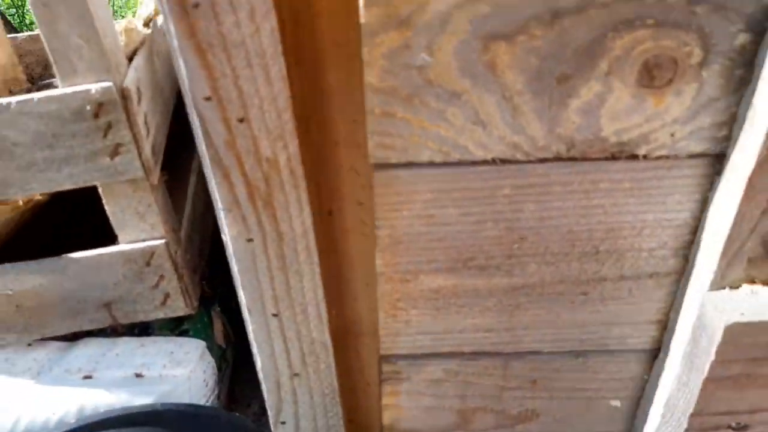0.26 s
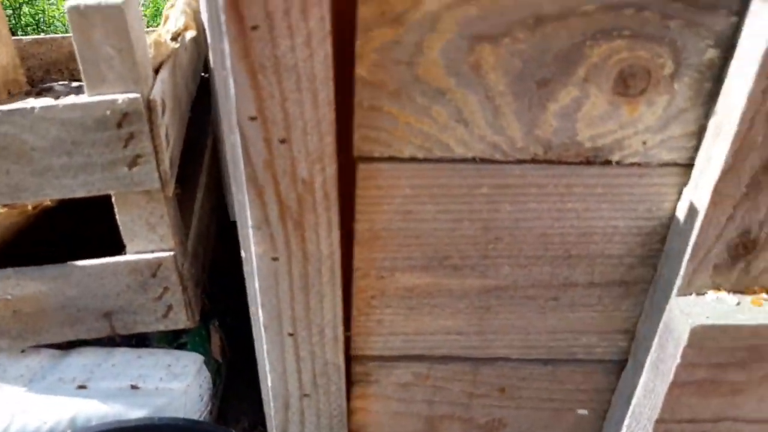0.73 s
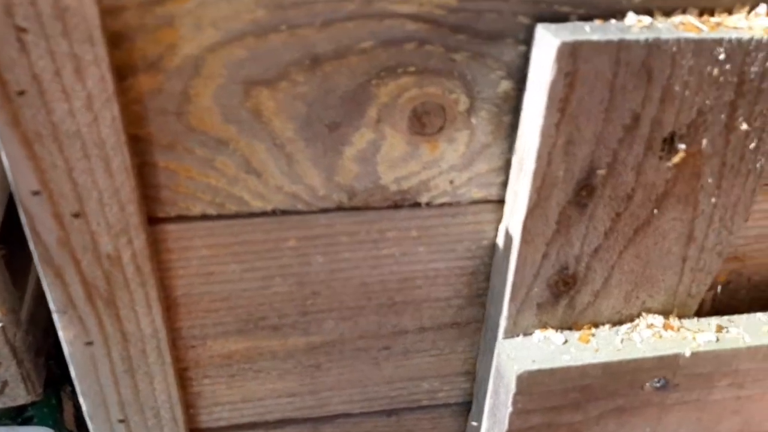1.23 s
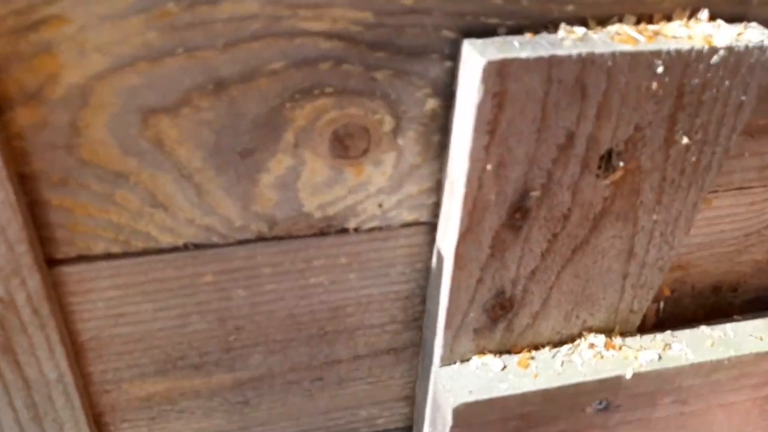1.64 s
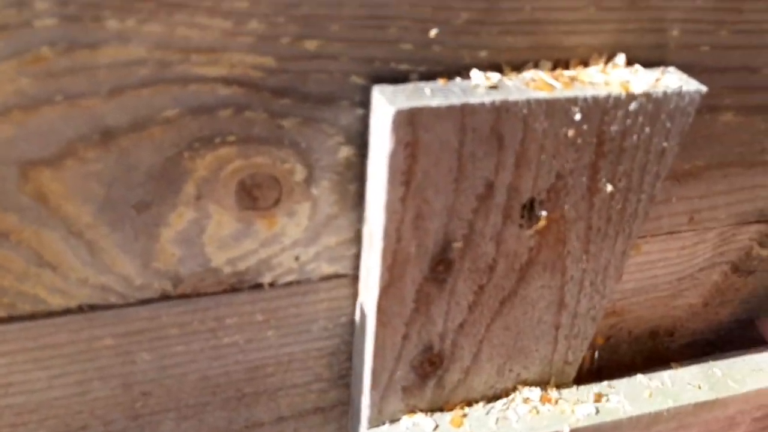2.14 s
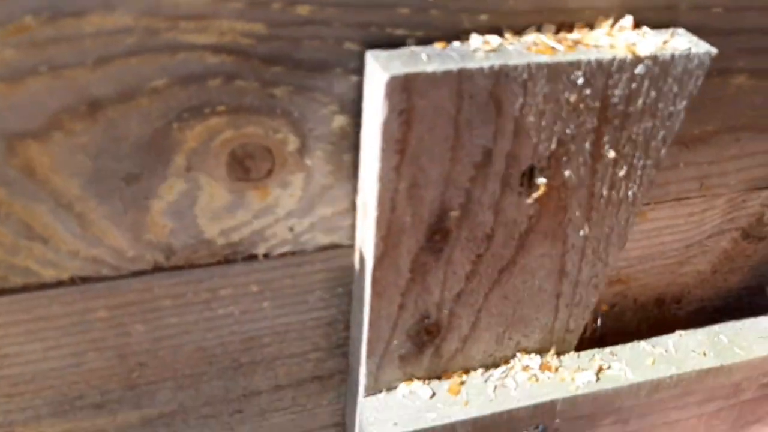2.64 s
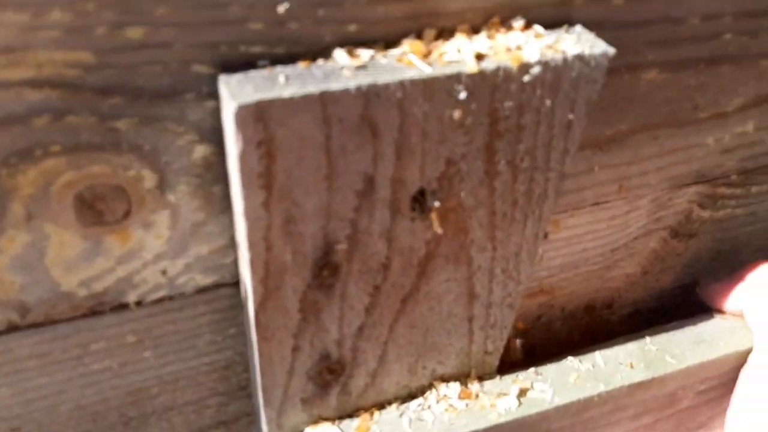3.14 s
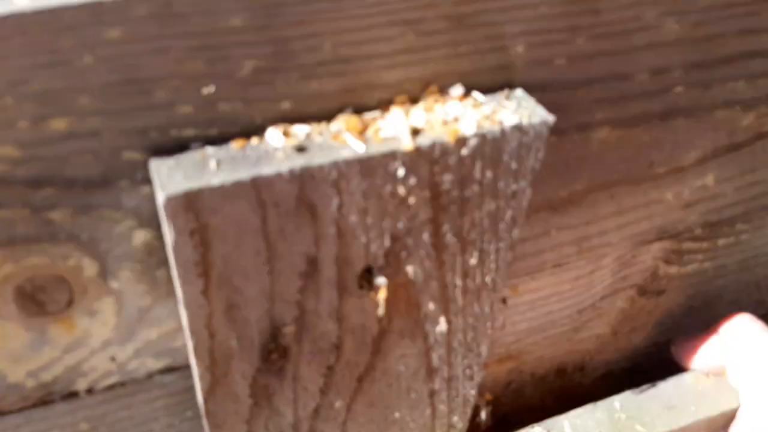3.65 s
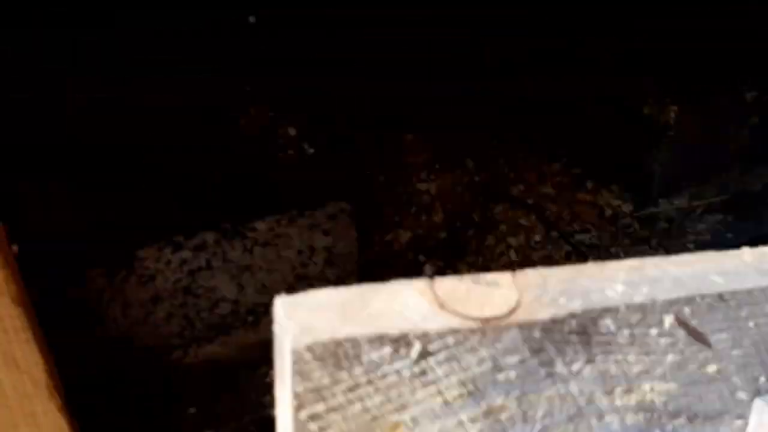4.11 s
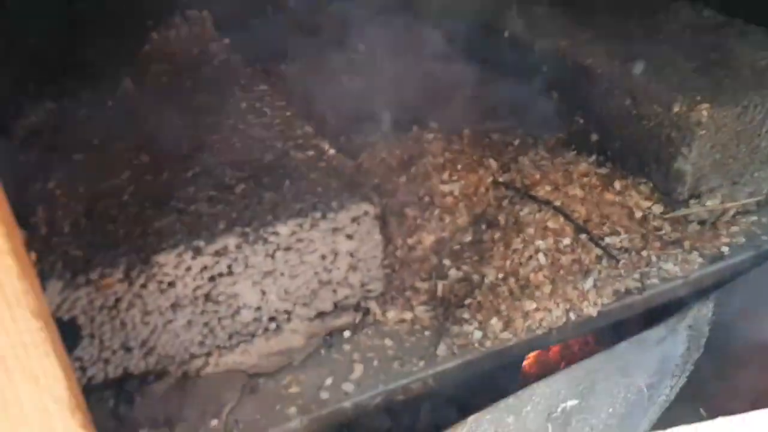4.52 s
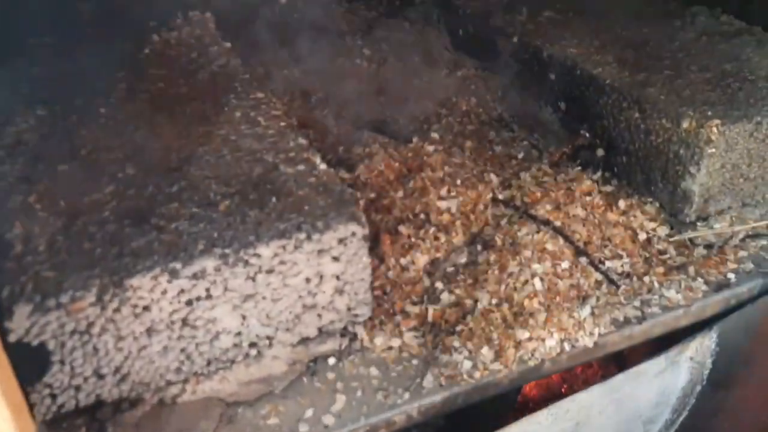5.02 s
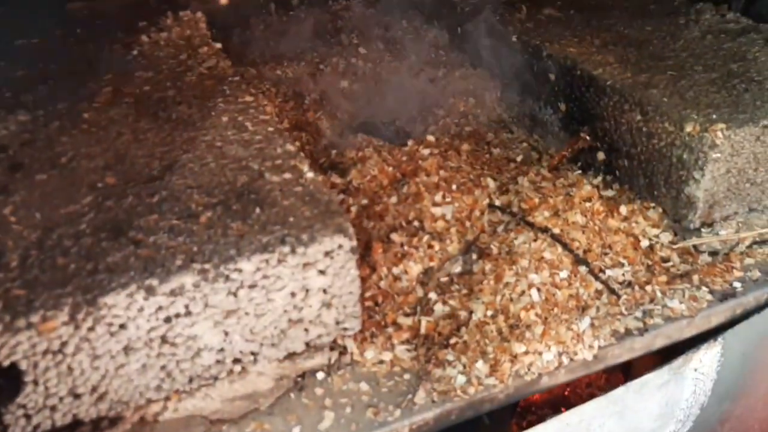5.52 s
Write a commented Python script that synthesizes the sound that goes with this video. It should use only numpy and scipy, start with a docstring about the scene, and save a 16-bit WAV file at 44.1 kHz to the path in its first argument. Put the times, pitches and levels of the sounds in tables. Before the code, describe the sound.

Hands shift dry wooden boards: faint rubbing, dull and sharp knocks in small groups, then a rapid clatter and one loud crack. A pause follows, then a clack as another board slides, squeaking briefly, hissing over wood chips, catching and juddering to the end. Heard close and slightly right, in a quiet yard with a faint hollow answer from the wooden box.

```python
"""Wooden planks, shifted by hand before a wooden smoker, knock, rub and once snap hard: damped modes
ringing under a dense noise cloud, and filtered slips for the rubbing.
Then a board strewn with chips is dragged aside: it squeaks (fuzzy whistle over shaken resonances),
hisses (noise through resonances) and judders (irregular slips, each ringing the board).
The box and yard answer faintly with decaying noise; the outdoor air is quiet filtered noise."""
import sys
import numpy as np
from scipy import signal
from scipy.fft import rfft, irfft, next_fast_len
from scipy.io import wavfile
from scipy.ndimage import uniform_filter1d, map_coordinates

SR = 44100
rng = np.random.default_rng(int(sys.argv[2]) if len(sys.argv) > 2 else 0)


def put_to_file(sound):
    """Save the sound as 16-bit audio at rate SR, in the file named by the first command-line argument."""
    columns = np.atleast_2d(sound).T  # one column per channel
    safe = np.clip(columns, -1, 1)
    whole_steps = np.round(safe * 32767)
    wavfile.write(sys.argv[1], SR, whole_steps.astype(np.int16))


N = 254456

# air noise spectrum: (frequency [Hz], density [dB/Hz])
AIR_SPECTRUM = [(15, -79), (25, -38.5), (45, -11.5), (92, -12), (141, -20.5), (206, -19.5), (405, -37.5),
                (489, -53), (2000, -58.5), (3520, -51), (9570, -57), (14800, -55), (16000, -72)]
# left-right likeness of diffuse sound: (frequency [Hz], correlation [0-1])
LIKENESS = [(100, 0.99), (300, 0.98), (700, 0.8), (3000, 0.28), (12000, 0.067)]
# bearing: (time [s], lag of the left port behind the right [ms], left over right [dB])
BEARING = [(0.3, 0.29, -6.5), (0.5, 0.32, -3), (3.3, 0.2, -2.5), (3.7, -0.31, -2), (3.98, -0.43, -2.2),
           (4.05, 0.35, -5.5), (5.3, 0.24, -2), (5.77, 0.33, -2.5)]

# soft hush of the first sliding plank: (time [s], level [dB])
HUSH_LEVEL = [(0, -49.5), (0.5, -57), (1.4, -56.5), (2.3, -57.5), (2.7, -64), (3.1, -89)]
# its spectrum: (frequency [Hz], density [dB/Hz])
HUSH_SPECTRUM = [(250, 3), (480, -4.5), (590, 3.5), (1000, -10.5), (1750, -2), (1950, -12.5), (2200, -4),
                 (2900, -14.5), (4000, -11), (4700, -8.5), (5600, -14), (9000, -22.5), (16000, -24)]

# short strokes of wood over wood:
# (start [s], length [s], level [dB], groan over level [dB], grit over level [dB])
STROKES = [(0.151, 0.1, -47, 7, -12), (0.239, 0.12, -58.5, 17, -16), (0.424, 0.15, -49, -7, -10.5),
           (0.578, 0.18, -49, -4, -8.5), (0.635, 0.78, -56, 9.5, -12), (0.877, 0.081, -44, -10, -11),
           (0.938, 0.043, -38.5, -7, -12), (0.984, 0.085, -43.5, 15.5, -16),
           (0.988, 0.44, -61.5, 15.5, -15), (1.269, 0.095, -49, -14, -37), (1.362, 0.054, -42, 9, -23),
           (1.535, 0.052, -46, 9.5, -34), (1.809, 0.15, -47.5, 5.5, -18), (1.96, 0.15, -56.5, 10.5, -22),
           (2.28, 0.072, -47, 4, -13), (2.39, 0.091, -47, 2, -9.5), (2.504, 0.075, -45, 5.5, -15),
           (2.656, 0.064, -42.5, -9.5, -20), (2.713, 0.092, -39.5, -5, -8), (2.851, 0.051, -37, 4, -3),
           (2.898, 0.03, -34, -5.5, 2.5), (2.986, 0.26, -60.5, 12.5, -11), (3.291, 0.21, -65, -0.5, -1.5),
           (3.417, 0.13, -55.5, 10, -22.5), (3.71, 0.21, -41, 3, -15), (4.155, 0.076, -36, -23, -7),
           (4.794, 0.051, -34, -9.5, -12)]
STROKE_ATTACK, STROKE_RELEASE = 0.3, 0.71  # shares of the length
# spectra of a rubbed plank's body and face, and of grit: (frequency [Hz], density [dB/Hz])
RUB_GROAN = [(35, -43), (60, -10.5), (150, -2.5), (300, -4), (400, -8), (480, -17), (650, -17), (900, -25),
             (1500, -61.5)]
RUB_RASP = [(450, -38.5), (700, -16), (1000, 0), (1650, -3.5), (1980, -5), (2200, -11.5), (2800, -9.5),
            (4700, -13), (5600, -19), (7500, -20), (11000, -46)]
GRIT = [(4000, -5.5), (6000, 0), (8400, -2), (9300, -5.5), (10400, -1.5), (12000, -1), (13500, -3),
        (16000, -6.5)]

# plank on plank: (time [s], level [dB], thump over body [dB], hardness: clack over body [dB])
KNOCKS = [(0.444, -34.5, 4.5, -8), (0.467, -28, -6, -40), (0.492, -16.5, -5.5, -19), (0.601, -34, 4.5, -20),
          (0.646, -24.5, -1, -12.5), (0.703, -21.5, -7.5, -11), (0.729, -28.5, -8, -9),
          (0.968, -24, -1.5, -0.5), (1.006, -20.5, 0, -2), (1.02, -21.5, -2, -20),
          (1.084, -28.5, -1.5, -21), (1.368, -29, 0.5, 4), (1.378, -22.5, -14.5, -3.5),
          (1.526, -42.5, 8, -7), (1.642, -27.5, -6, -2.5), (1.797, -15, -10, -7), (1.835, -35, -22, 4.5),
          (2.187, -34, -2.5, -5), (2.545, -21.5, -3, -5), (2.57, -21, -14, -7), (2.784, -13.5, -2.5, 1.5),
          (2.8, -15, -8.5, -15.5), (2.829, -26.5, -13, 2), (2.855, -26.5, -8, -20),
          (2.899, -14.5, 1.5, -7.5), (2.913, -22, -0.5, 1), (2.937, -17.5, -5.5, -18),
          (3.807, -14.5, -6.5, -0.5), (3.813, -18, -6, -6)]
# plank modes: (frequency [Hz], level [dB], t60 [s])
PLANK_MODES = [(65, -9, 0.57), (91.5, 10, 0.12), (118, 7, 0.2), (151.4, 7.5, 0.24), (164, 6, 0.051),
               (208.5, -4, 0.57), (255.1, -5, 0.27), (288.9, 8.5, 0.17), (316.4, 8.5, 0.073),
               (374.6, 3, .15), (441, -0.5, 0.06), (490.4, -8.5, 0.25), (640, -2.5, 0.067), (775, 2, 0.052),
               (912, -0.5, 0.092), (1059.4, 0, 0.12), (1224, -2, 0.092), (1420, -7, 0.068), (1560, -3, 0.1),
               (2083, -10, 0.04), (2590, 11, 0.028), (3380, 9, 0.034)]
# shared colour of struck wood: (frequency [Hz], level [dB])
WOOD_COLOUR = [(30, -23), (70, -0.5), (300, 1.0), (650, -6.5),
               (1200, 2.5), (3000, -6.5), (6000, -15.5), (15000, -34.5)]
# dense ring of the wood: (frequency [Hz], t60 [s])
GRAIN_T60 = [(100, 0.7), (400, 0.33), (1200, 0.052), (3000, 0.022), (10000, 0.018)]
RISE_S, RISE_DOUBLES_DB = 0.00046, 23.5  # onset at hardness 0; doubles for a contact this much softer
TREBLE_DB, TREBLE_DB_PER_HARD_DB = -21, 0.76

# box and yard decay: (frequency [Hz], t60 [s])
BOX_T60 = [(80, 1), (300, 0.66), (800, 0.62), (3000, 0.12), (7000, 0.84), (10000, 0.36)]
# box and yard answer: (frequency [Hz], gain [dB])
BOX_GAIN = [(100, -13), (300, -14.0), (900, -20.0), (3000, -8.5), (7000, -24.0), (10000, -28.5)]

# snaps of edges and chips: (time [s], level [dB], brightness [dB])
SNAPS = [(0.62, -38.5, -8), (0.9685, -20.5, -11), (0.9725, -21, -25), (0.9935, -18.5, -16.5),
         (1.3675, -24.5, -44), (2.5129, -28.5, -15), (2.5453, -24, -24.5), (2.7884, -18.5, -25),
         (2.829, -20.5, -21.5), (2.911, -5.5, -13), (2.9155, -10.5, -27.5), (3.313, -32.5, -14.5),
         (3.7219, -32, -18), (3.785, -28.5, -12), (3.807, -16.5, -28), (3.8253, -18, -23),
         (3.849, -24, -13), (4.183, -21.5, -12), (4.2288, -17.5, -22), (4.5479, -18.5, -21),
         (4.812, -23, -34), (4.821, -19, -29), (4.858, -28, -12), (5.13, -35.5, -4), (5.1765, -29, -10)]
# modes of a snapping edge: (frequency [Hz], level [dB], t60 [s])
EDGE_MODES = [(1160, -9.5, 0.088), (1690, -3.5, 0.033), (2321, -5.5, 0.038), (2710, -6.5, 0.019),
              (2520, -12.5, 0.026), (3530, -7, 0.058), (3946, -6.5, 0.063), (4600, -6, 0.01),
              (5200, 0.5, 0.0077), (7720, 4, 0.0081), (7500, 2.5, 0.0049), (9120, -11, 0.019),
              (10200, 1, 0.014)]
# diffuse tail of a snap, spectrum: (frequency [Hz], density [dB/Hz])
SNAP_TAIL_SPECTRUM = [(500, -16), (1200, -0.5), (2700, 1.5), (3600, -5.5), (5500, -7.5), (8000, -10.5),
                      (15000, -23)]
# and its decay: (frequency [Hz], t60 [s])
SNAP_TAIL_T60 = [(1000, 0.36), (3000, 0.3), (7000, 0.23), (12000, .24)]

# thin slat caught on its edge: (time [s], pitch [Hz], level [dB])
CLACKS = [(0.969, 1210, -19), (0.993, 1320, -34), (1.007, 1284, -27.5), (2.786, 943, -17),
          (2.83, 1240, -23), (2.914, 950, -15.5)]
# slat modes: (multiple of the pitch [ratio], level [dB])
SLAT_MODES = [(.8, -12), (0.999, 2.5), (1.14, -11)]

# board dragged along the frame: (time [s], scrape level [dB], speed [0-1])
DRAG = [(3.68, -72.5, 0.44), (3.74, -58.5, 0.06), (3.87, -47, 0.73), (4.12, -50.5, 0.87),
        (4.2, -41.5, 0.65), (4.36, -45, 0.89), (4.5, -49.5, 0.96), (4.62, -43, 0.71), (4.76, -57, 1),
        (4.86, -54, 1), (5.04, -44.5, 0.75), (5.16, -44.5, 0.67), (5.26, -43.5, 0.27), (5.38, -51.5, 0.45),
        (5.52, -43.5, 0.03), (5.66, -49.5, 0.3), (5.72, -42.5, 0.03)]
# spectra of its body, its face, and its face while juddering: (frequency [Hz], density [dB/Hz])
DRAG_GROAN = [(60, -44), (100, -1.5), (175, -10.5), (250, 1), (430, -8), (600, -5), (760, -37), (950, -48),
              (1500, -52)]
DRAG_RASP = [(450, 4), (800, 13.5), (1000, 4), (1200, -3), (1380, -22), (1620, -1), (2060, -10),
             (2340, -10), (2680, -2), (3000, 10), (3600, 14.5), (4450, 1), (5400, 7), (6000, -30),
             (7500, 3), (10000, -37)]
JUDDER_RASP = [(250, -12), (430, 1), (780, -23), (980, 3.5), (1200, -6), (1600, -3), (2000, -11),
               (2580, -7.5), (3200, -15.5), (3800, -9), (4400, -12), (7500, -23), (11000, -26.5)]
# resonances of the sliding hiss: (frequency [Hz], width [Hz], level [dB])
FRAME_RESONANCES = [(1173, 56, 2.5), (1760, 290, 1.5), (2360, 150, 6), (3040, 60, 3.5), (3850, 86, 0),
                    (4490, 580, 2.5), (5840, 120, 3), (9140, 610, -5.5)]
FULL_SPEED_GROAN_DB, GROAN_DB_PER_SPEED = -9.5, -10.5  # over the scrape; a slow board groans
FULL_SPEED_GRIT_DB, GRIT_DB_PER_SPEED = 4.5, 30  # a fast one makes the chips hiss
JUDDER_RASP_FROM_S = 5.01

# dry edge squeal: (time [s], whistle pitch [Hz], whistle level [dB], board answer level [dB])
SQUEAK = [(3.83, 5450, -66, -52), (3.86, 5450, -50, -41), (3.9, 5400, -46.5, -42.5),
          (3.98, 5260, -44.5, -35), (4.01, 5000, -46, -33), (4.06, 4998, -44.5, -42.5),
          (4.13, 4840, -50.5, -78), (4.17, 4830, -65, -59)]
# board resonances excited by the squeal: (frequency [Hz], width [Hz], level [dB])
BOARD_RESONANCES = [(148, 32, -10), (240, 67, 4.5), (770, 83, -5.5), (1000, 130, -5), (1440, 120, -5),
                    (2370, 89, -5), (3080, 110, -8)]

# creaks of the sliding edge: (start [s], length [s], start pitch [Hz], end pitch [Hz], level [dB])
CREAKS = [(3.889, 0.033, 1570, 1760, -27.5), (3.933, 0.026, 1427, 1470, -27),
          (3.935, 0.13, 2970, 3030, -44), (4.049, 0.26, 2434, 2380, -46), (4.097, 0.088, 2940, 3020, -45.5),
          (4.222, 0.31, 2360, 2290, -49)]

# dragged board catching on the frame: (time [s], level [dB], hardness [dB], treble [dB])
CATCHES = [(4.168, -34, 6.5, 14.5), (4.227, -45, 20.5, 17), (4.541, -28.5, 9, 12), (4.549, -28, 10.5, 11.5),
           (4.559, -21.5, -15, -26), (4.8, -29.5, -23, 11), (5.011, -28, -6, -25), (5.096, -31.5, -21, -27),
           (5.154, -27, -19, -27), (5.411, -29.5, -3, -1), (5.492, -30.5, 0, 7.5), (5.59, -23, -6.5, -30)]
# dragged board modes: (frequency [Hz], level [dB], t60 [s])
SLIDER_MODES = [(216, -8, 0.78), (253.7, 7, 0.22), (340, 5.5, 0.12), (424.4, 2, 0.22), (493, 6, 0.12),
                (551, 4.5, 0.14), (677, 0, 0.13), (790, -5, 0.07), (982, -1, 0.071), (1284, 8, 0.031),
                (1608, 8.5, 0.081), (2120, 0.5, 0.076)]
CATCH_THUMP_DB, CATCH_RISE_S = -21, 0.0016  # light glancing blows: little thump

# stuttering board: (time [s], relative slip level [dB])
JUDDER_LEVEL = [(4.84, -39), (5.0, -50.5), (5.04, -40), (5.075, -50), (5.11, -31.5), (5.18, -34.5),
                (5.25, -50), (5.31, -33), (5.37, -70), (5.44, -48), (5.56, -41), (5.62, -35), (5.67, -47),
                (5.7, -34)]
# colour of a slip: (frequency [Hz], level [dB])
JUDDER_COLOUR = [(200, -13.5), (420, -1.5), (650, -8.5), (1000, 8.5), (1600, -13), (2100, -9)]

TOP_HZ, TOP_EDGE_HZ = 15900, 200  # band limit and half-width of its slope
TIME = np.arange(N) / SR
RING = np.arange(SR // 2) / SR


def amp(db):
    """Decibels to gain."""
    return 10 ** (np.asarray(db) / 20)


def unit(x):
    """Scale to rms 1."""
    return x / np.sqrt(np.mean(x ** 2) + 1e-20)


def along(points, hz):
    """(Hz, value) points read on a log axis."""
    f, v = np.transpose(points)
    return np.interp(np.log(hz + 1), np.log(f + 1), v)


def curves(rows, t=TIME):
    """Each column after the first, read at times t."""
    s, *cols = np.transpose(rows)
    return [np.interp(t, s, c) for c in cols]


def wobble(rate_hz):
    """A smooth random curve, rate_hz knots a second."""
    knots = rng.standard_normal(int(N * rate_hz / SR) + 4)
    return map_coordinates(knots, [TIME * rate_hz])


def noise_pair(n=N):
    """Two unrelated white noises."""
    return rng.standard_normal((2, n))


def filtered(x, response):
    """x times a response of frequency."""
    n = x.shape[-1]
    m = next_fast_len(n + 8192)
    return irfft(rfft(x, m) * response(np.fft.rfftfreq(m, 1 / SR)), m)[..., :n]


def spread(pair):
    """Two unrelated signals become left and right, alike in the bass."""
    def mid_side(hz):
        turn = np.arccos(np.clip(along(LIKENESS, hz), 0, 1)) / 2
        return np.array([np.cos(turn), np.sin(turn)])
    mid, side = filtered(pair, mid_side)
    return np.array([mid + side, mid - side])


def coloured(pair, spectrum):
    """Spread noise shaped by a (Hz, dB) spectrum."""
    return filtered(spread(pair), lambda hz: amp(along(spectrum, hz)))


def dying(noise, t60s):
    """Each frequency of the noise fades at its own speed."""
    hz, t, z = signal.stft(noise, SR, nperseg=256)
    fade = amp(-60 * t / along(t60s, hz)[:, None])
    return signal.istft(z * fade, SR, nperseg=256)[1][:, :len(RING)]


def resonances(modes, hz):
    """Response of a few (Hz, width, dB) resonances, alternating in sign."""
    return sum((-1) ** k * amp(db) * 1j * hz * width / (centre ** 2 - hz ** 2 + 1j * hz * width)
               for k, (centre, width, db) in enumerate(modes))


def ring(modes, colour, t, scatter_db, port_turn, detune=0.018):
    """Damped modes, struck with new strengths and heard a little differently at each port."""
    hz, db, t60_s = np.transpose(modes)[:, :, None]
    hz = hz * np.exp(detune * rng.standard_normal(hz.shape))  # the grip changes from blow to blow
    size = amp(db + colour(hz) + scatter_db * rng.standard_normal(hz.shape))
    phase = 2 * np.pi * rng.random(hz.shape)
    phase = phase + port_turn * np.sqrt(hz / 1000) * rng.standard_normal((2,) + hz.shape)
    return np.sum(size * amp(-60 * t / t60_s) * np.sin(2 * np.pi * hz * t + phase), axis=1)


def onset(t, rise_s):
    """Exponential rise of a contact."""
    return 1 - np.exp(-t / rise_s)


def add(track, s, sound):
    """Mix a sound in at time s."""
    part = track[:, max(round(s * SR), 0):][:, :sound.shape[1]]
    part += sound[:, :part.shape[1]]


def placed(pair, lag_ms):
    """Sound from one side reaches the far port later."""
    half_lag_s = lag_ms / 1000 / 2
    return np.array([map_coordinates(x, [(TIME + side * half_lag_s) * SR])
                     for x, side in zip(pair, (-1, 1))])


def friction(spectrum, slips_per_s, slip_share, uneven_db, flutter_hz):
    """Fibres catch and let go: tiny slips over a smooth hiss, under an uneven pressure."""
    slips = (rng.random(N) < slips_per_s / SR) * noise_pair()
    force = np.sqrt(slip_share) * unit(slips) + np.sqrt(1 - slip_share) * noise_pair()
    return unit(coloured(force * amp(uneven_db * wobble(flutter_hz)), spectrum))


def stroke(start_s, length_s):
    """The pressure of a hand rises, then falls more slowly."""
    u = (TIME - start_s) / length_s
    return np.clip(np.minimum(u / STROKE_ATTACK, (1 - u) / STROKE_RELEASE), 0, 1)


def air(level_db=-57):
    """Quiet outdoor air with a low rumble."""
    noise = unit(coloured(noise_pair(), AIR_SPECTRUM))
    return amp(level_db + 1.4 * wobble(12.0)) * noise


def hush():
    """A faint hiss of wood sliding on wood."""
    return amp(curves(HUSH_LEVEL)[0]) * friction(HUSH_SPECTRUM, 3000, 0.17, uneven_db=4.0, flutter_hz=28.66)


def crumbs(centre_hz=2000, spread_octaves=.8, cycles=12, size_db=2, count=7000):
    """Chips and splinters tick one by one, each with its own short note."""
    t = RING[:SR // 90]
    hz = centre_hz * 2 ** (spread_octaves * rng.standard_normal((count, 1)))
    hz = np.clip(hz, 700, 12000)
    size = amp(size_db * np.minimum(rng.exponential(size=(count, 1)), 3))
    notes = size * np.exp(-np.pi * hz * t / cycles) * np.sin(2 * np.pi * hz * t)
    where = (rng.integers(N, size=(count, 1)) + np.arange(len(t))).ravel()
    ports = []
    for _ in range(2):
        heard = notes * amp(1.8 * rng.standard_normal((count, 1)))
        ports.append(np.bincount(where, heard.ravel(), N)[:N])
    return unit(np.array(ports))


def touched(pair, t60_s=0.034):
    """The rubbed wood answers with a short, dense ring."""
    t = RING[:SR // 25]
    answer = spread(noise_pair(len(t))) * amp(-60 * t / t60_s)
    return signal.fftconvolve(pair, answer / np.linalg.norm(answer[0]), axes=1)[:, :pair.shape[1]]


def rubbing(rasp_db=-1, crumbs_db=-6):
    """Each stroke makes the plank groan, its face rasp and the grit on it hiss."""
    out = np.zeros((2, N))
    body = friction(RUB_GROAN, 120, 0.13, uneven_db=3.0, flutter_hz=28.87)
    face = amp(rasp_db) * friction(RUB_RASP, 1900, 0.33, uneven_db=4.0, flutter_hz=72.05)
    face += amp(crumbs_db) * crumbs()
    grit = friction(GRIT, 1600, 0.25, uneven_db=3.5, flutter_hz=80.07)
    for start_s, length_s, db, groan_db, grit_db in STROKES:
        span = slice(round(start_s * SR), round((start_s + length_s) * SR) + SR // 25)  # room for the ring
        pressure = amp(db) * stroke(start_s, length_s)[span]
        out[:, span] += pressure * amp(groan_db) * body[:, span]
        out[:, span] += touched(pressure * (face[:, span] + amp(grit_db) * grit[:, span]))
    return out


def blow(modes, db, thump_db, clack_db, treble_db, rise_s, modes_db=-14.5, dense_db=-7.5):
    """One blow rings a board's modes and a dense cloud of shorter ones."""
    t = RING[:SR // 4]
    contact = [(130, thump_db), (270, 0), (520, 0), (900, clack_db + 1.0), (1600, clack_db), (3000, treble_db)]
    colour = lambda hz: along(contact, hz)
    noise = filtered(spread(noise_pair(len(t))),
                     lambda hz: amp(colour(hz) + along(WOOD_COLOUR, hz) + 12))
    cloud = dying(noise, GRAIN_T60)[:, :len(t)]
    tones = ring(modes, colour, t, scatter_db=3.0, port_turn=0.46)
    return amp(db) * (amp(modes_db) * tones + amp(dense_db) * cloud) * onset(t, rise_s)


def bent(pair, bass_delay_s=0.0014):
    """Bending waves: the lowest travel slowest."""
    return filtered(pair, lambda hz: np.exp(-4j * np.pi * bass_delay_s * np.sqrt(300 * hz)))


def knocks():
    """Planks knock; harder contacts are brighter and start faster."""
    out = np.zeros((2, N))
    for s, db, thump_db, hard_db in KNOCKS:
        rise_s = RISE_S * 2 ** (-hard_db / RISE_DOUBLES_DB)
        treble_db = TREBLE_DB + TREBLE_DB_PER_HARD_DB * hard_db
        add(out, s - .001, blow(PLANK_MODES, db, thump_db, hard_db, treble_db, rise_s))
    return bent(out)


def box(x):
    """The wooden box and the yard answer with a diffuse tail, longest in the bass."""
    tail = dying(spread(noise_pair(len(RING))), BOX_T60) * onset(RING, 0.0017)
    wet = signal.fftconvolve(x, tail / np.linalg.norm(tail[0]), axes=1)[:, :N]
    return filtered(wet, lambda hz: amp(along(BOX_GAIN, hz)))


def snaps(modes_db=-7, crack_db=-5, crack_t60_s=0.035, lag_ms=-0.386, chatter_s=0.00098, left_db=1.5):
    """Hard edges slip and slap, chattering for an instant: a short crack with the high ring of the wood."""
    out = np.zeros((2, N))
    t = RING[:SR // 20]
    for s, db, bright_db in SNAPS:
        spectrum = [(3000, 0), (7000, bright_db + 11.5), (15000, bright_db + 0.5)]
        colour = lambda hz: along(spectrum, hz)
        crack = coloured(noise_pair(len(t)), spectrum)
        add(out, s, amp(db + crack_db - 60 * t / crack_t60_s) * crack)
        ring_db = modes_db + .5 * db  # light touches tick, hard slaps ring
        for k, touch_db in enumerate([-1, -2, -7]):
            tones = ring(EDGE_MODES, colour, t, scatter_db=-2.0, port_turn=0.34)
            add(out, s + k * chatter_s, amp(db + ring_db + touch_db) * tones)
    return placed(out, lag_ms) * amp([[left_db], [-left_db]])


def snap_echo(level_db):
    """The yard scatters each snap into a diffuse tail."""
    out = np.zeros((2, N))
    for s, db, _ in SNAPS:
        noise = unit(coloured(noise_pair(len(RING)), SNAP_TAIL_SPECTRUM))
        add(out, s, amp(db + level_db) * dying(noise, SNAP_TAIL_T60) * onset(RING, 0.003))
    return out * amp(1.4 * wobble(45))


def clacks(t60_s=0.045):
    """The slat rings briefly, at a pitch set by where it is caught."""
    out, t = np.zeros((2, N)), RING[:SR // 8]
    for s, hz, db in CLACKS:
        modes = [(hz * multiple, level_db, t60_s) for multiple, level_db in SLAT_MODES]
        tones = ring(modes, np.zeros_like, t, scatter_db=3, port_turn=.5)
        add(out, s, amp(db) * tones * onset(t, RISE_S))
    return out


def patchy(pair, depth_db=2):
    """The grain under the sliding edge changes, so the colour of the hiss shifts in patches."""
    z = signal.stft(pair, nperseg=512)[2]
    field = uniform_filter1d(rng.standard_normal(z.shape[1:]), size=5, axis=0)  # over frequency
    field = uniform_filter1d(field, size=14, axis=1)  # over time
    return signal.istft(z * amp(depth_db * unit(field)), nperseg=512)[1][:, :N]


def dragging(rasp_db=-1):
    """The board hisses along the frame and groans when slow; its rasp turns to that of a judder."""
    level_db, speed = curves(DRAG)
    groan_db = FULL_SPEED_GROAN_DB + GROAN_DB_PER_SPEED * (speed - 1)
    grit_db = FULL_SPEED_GRIT_DB + GRIT_DB_PER_SPEED * (speed - 1)
    body = amp(groan_db) * friction(DRAG_GROAN, 300, 0.35, uneven_db=3, flutter_hz=35)
    singing = unit(filtered(spread(noise_pair()), lambda hz: resonances(FRAME_RESONANCES, hz)))
    sliding = .5 * friction(DRAG_RASP, 2500, .4, uneven_db=1.1, flutter_hz=90) + .9 * singing
    juddering = friction(JUDDER_RASP, 980, 0.14, uneven_db=2.0, flutter_hz=62.5)
    face = np.where(TIME > JUDDER_RASP_FROM_S, juddering, sliding)
    chips = amp(grit_db) * friction(GRIT, 1000, 0.15, uneven_db=1.3, flutter_hz=128.5)
    return amp(level_db) * (body + patchy(amp(rasp_db) * face + chips)) * (TIME > DRAG[0][0])


def drifting(pair, depth, rate_hz):
    """The contact moves, so every resonance wanders in pitch."""
    t = TIME + depth * wobble(rate_hz) / rate_hz
    return np.array([map_coordinates(x, [t * SR]) for x in pair])


def squeak(width_hz=480, stutter_db=2.5, upper_db=-11):
    """Fast, rough stick-slip: a sinking whistle, a faint upper mode and the board's shaken resonances."""
    hz, whistle_db, answer_db = curves(SQUEAK)
    phase = 2 * np.pi * np.cumsum(hz) / SR

    def fuzzy(multiple):
        rate_hz = multiple * width_hz
        return unit(wobble(rate_hz) * np.sin(multiple * phase) + wobble(rate_hz) * np.cos(multiple * phase))

    upper = fuzzy(2.27)
    whistle = fuzzy(1.0) + amp(upper_db) * upper
    slips = spread(noise_pair()) * amp(stutter_db * wobble(53))
    shaken = filtered(slips, lambda f: resonances(BOARD_RESONANCES, f))
    answer = unit(drifting(shaken, depth=0.0198, rate_hz=25))
    sliding = (TIME > SQUEAK[0][0]) & (TIME < SQUEAK[-1][0])
    return sliding * (amp(whistle_db + 2.4 * wobble(83)) * whistle + amp(answer_db) * answer)


def creaks(rough_rad=0.81):
    """The edge sings for an instant on a rough, gliding note."""
    out = np.zeros(N)
    for start_s, length_s, from_hz, to_hz, db in CREAKS:
        hz = np.interp(TIME, [start_s, start_s + length_s], [from_hz, to_hz])
        phase = 2 * np.pi * np.cumsum(hz) / SR + rough_rad * wobble(220)
        out += amp(db) * stroke(start_s, length_s) * np.sin(phase)
    return out * amp(2.6 * wobble(150))


def catches():
    """The dragged board catches on the frame in glancing blows."""
    out = np.zeros((2, N))
    for s, db, hard_db, treble_db in CATCHES:
        add(out, s - .001, blow(SLIDER_MODES, db, CATCH_THUMP_DB, hard_db, treble_db, CATCH_RISE_S))
    return bent(out)


def judder(slips_per_s=100, level_db=-13.0, uneven_db=2.8):
    """The slow board sticks and slips at an uneven rate; each slip rings it anew."""
    out, t = np.zeros((2, N)), RING[:SR // 7]
    colour = lambda hz: along(JUDDER_COLOUR, hz)
    for k, (late, size) in enumerate(rng.standard_normal((105, 2))):
        s = JUDDER_LEVEL[0][0] + (k + 0.344 * late) / slips_per_s
        slip_db = curves(JUDDER_LEVEL, s)[0] + level_db + uneven_db * size
        tones = ring(SLIDER_MODES, colour, t, scatter_db=3.0, port_turn=0.58, detune=0.0424)
        add(out, s, amp(slip_db) * tones * onset(t, 0.0015))
    return out


def scene():
    """All the wood, a little to the right, with its echo and the air."""
    lag_ms, balance_db = curves(BEARING)
    blows = knocks() + catches() + clacks()
    slides = rubbing() + hush() + dragging() + squeak() + creaks() + judder()
    wood = placed(blows + slides, lag_ms)
    mix = wood + box(wood) + snaps() + snap_echo(level_db=-30) + air()
    return mix * amp([balance_db / 2, -balance_db / 2])


def record(dry, low_cut_hz=48):
    """Shed deep bass, clip at full scale and keep nothing above the band limit."""
    lean = signal.sosfilt(signal.butter(3, low_cut_hz, "high", fs=SR, output="sos"), dry)
    band_hz = [TOP_HZ - TOP_EDGE_HZ, TOP_HZ + TOP_EDGE_HZ]
    return filtered(np.clip(lean, -1, 1), lambda hz: np.interp(hz, band_hz, [1, 0]))


dry = scene()
out = record(dry)
put_to_file(out)
```